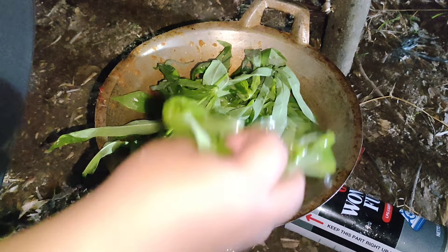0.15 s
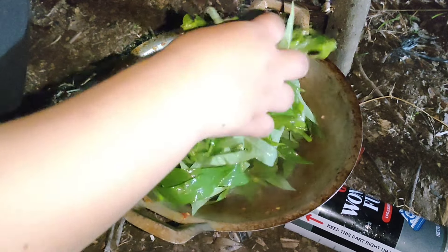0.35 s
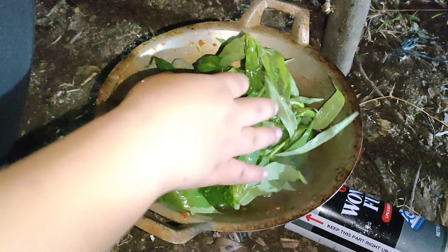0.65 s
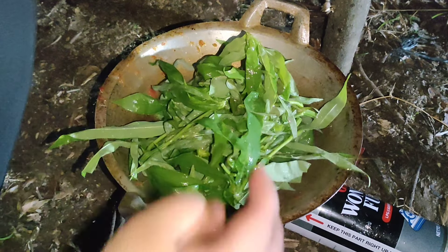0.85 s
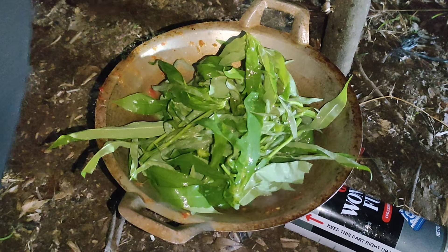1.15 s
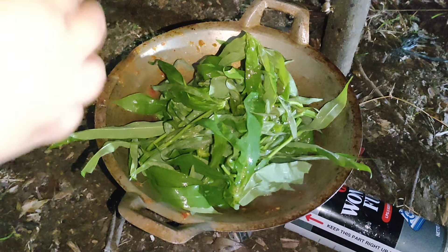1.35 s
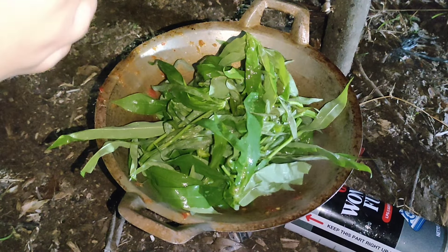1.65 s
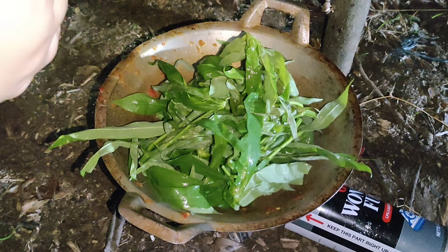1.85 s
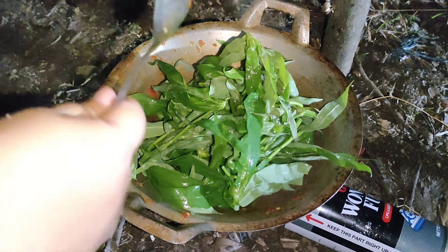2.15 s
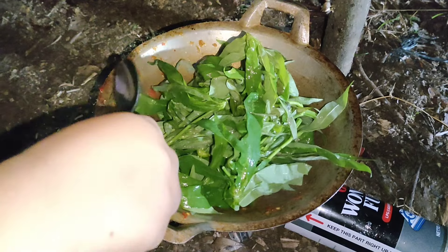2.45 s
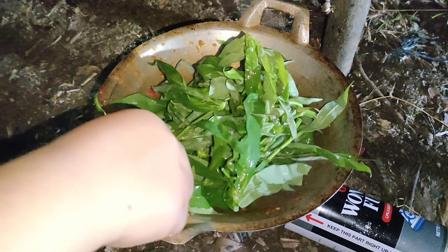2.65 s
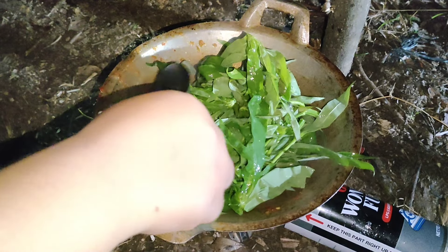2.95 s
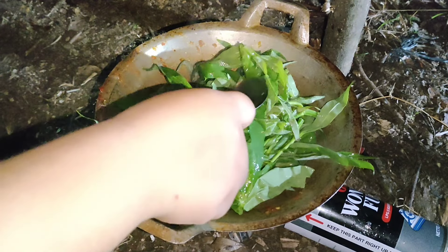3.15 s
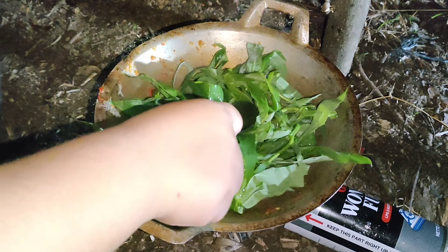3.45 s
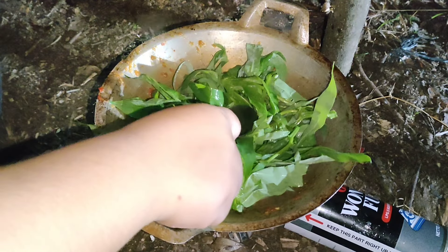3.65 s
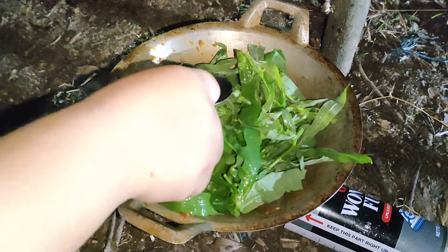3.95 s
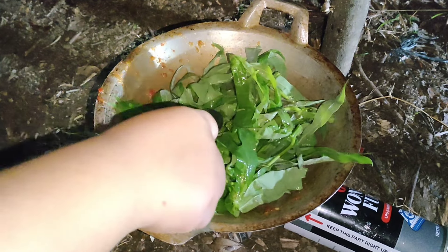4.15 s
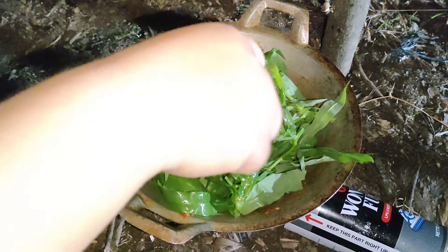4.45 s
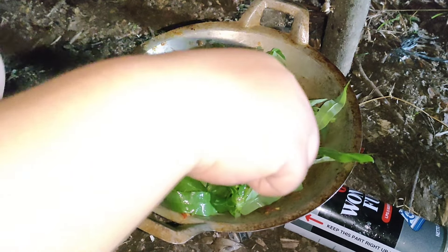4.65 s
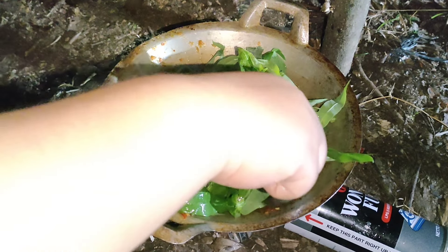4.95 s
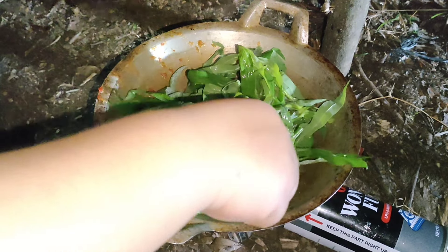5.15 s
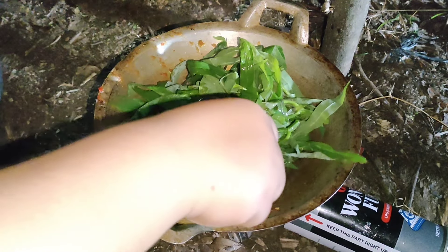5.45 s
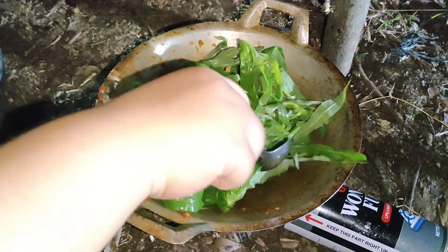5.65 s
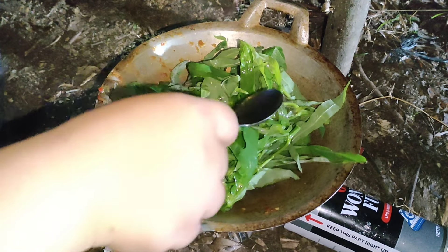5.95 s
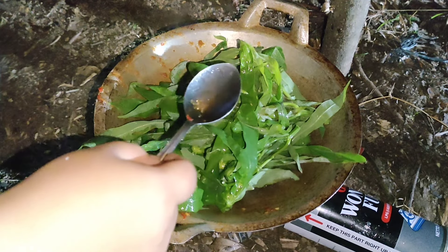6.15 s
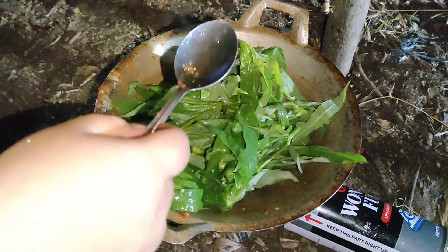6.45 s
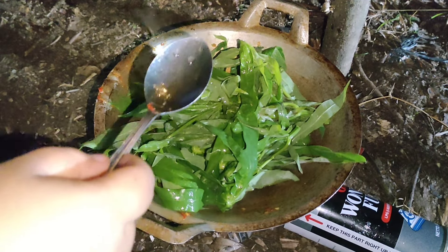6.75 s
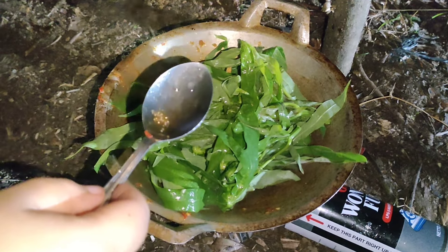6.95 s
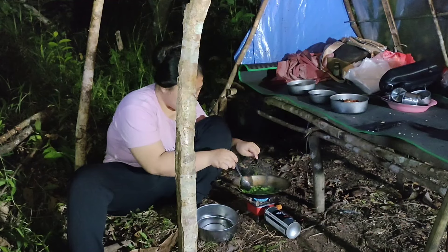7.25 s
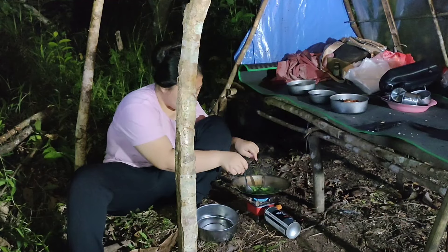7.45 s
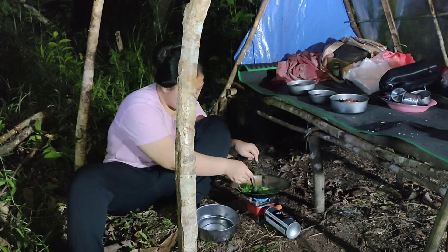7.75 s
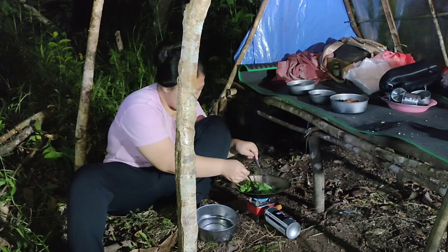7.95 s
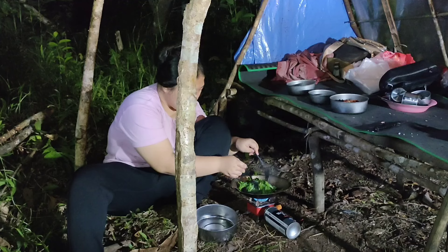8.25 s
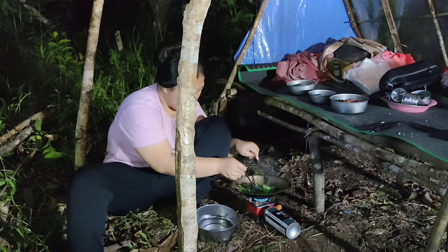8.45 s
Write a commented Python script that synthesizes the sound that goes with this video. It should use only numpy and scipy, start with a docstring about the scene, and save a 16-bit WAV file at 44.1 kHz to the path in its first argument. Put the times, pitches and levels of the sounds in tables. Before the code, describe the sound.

Night forest camp: whooping and rattling frogs over a shimmering high insect chorus, wet greens faintly sizzling and crackling close by.

```python
"""Night at a forest camp, heard through a pair of microphone ports. At first a small frog peeps while a near
frog whoops in a run of rising notes, its first whoop already under way at the start; a frog among the trees
whoops too, once faintly soon after, then in a late run. All along, others rattle in bouts of short pulse trains
over a drone of crickets and katydids, and close by wet leaves sizzle softly in a hot wok. Whoops are gliding
harmonics, rattles filtered clicks, insects pulsed tones and noise, sizzle noise bursts."""
import sys
import numpy as np
from scipy import signal
from scipy.fft import rfft, irfft, next_fast_len
from scipy.io import wavfile

SR = 44100
rng = np.random.default_rng(int(sys.argv[2]) if len(sys.argv) > 2 else 0)


def dump_mix(stems):
    """Bounce the given channels to the path in sys.argv[1] as a 16-bit WAV at rate SR."""
    frames = np.atleast_2d(stems).T  # one column per channel
    limited = np.clip(frames, -1, 1)  # hard clip at full scale
    pcm = np.round(limited * 32767).astype(np.int16)
    wavfile.write(sys.argv[1], SR, pcm)


N = 379701
TIME = np.arange(N) / SR


def amp(db):
    """Turns decibels into a factor of amplitude."""
    return 10 ** (np.asarray(db) / 20)


def unit(x):
    """Scales to rms 1."""
    return x / np.sqrt(np.mean(x ** 2) + 1e-20)


def read(points, hz):
    """Reads a curve whose points are joined by straight lines in log frequency."""
    f, value = np.transpose(points)
    return np.interp(np.log(hz + 1e-6), np.log(f), value)


def add(mix, s, sound):
    """Mixes a sound in at a time in seconds; what falls before zero is lost."""
    at = round(s * SR)
    sound = sound[..., max(-at, 0):]
    part = mix[:, max(at, 0):][:, :sound.shape[-1]]
    part += sound[..., :part.shape[1]]


def colour(x, gain):
    """Filters by a function of frequency; rms 1."""
    size = next_fast_len(x.shape[-1])
    spectrum = rfft(x, size) * gain(np.fft.rfftfreq(size, 1 / SR))
    return unit(irfft(spectrum, size)[..., :x.shape[-1]])


def band(shape, hz, width):
    """Noise in a steep resonance; rms 1."""
    noise = rng.standard_normal(shape)
    return colour(noise, lambda f: 1 / (1 + (2 * (f - hz) / width) ** 2) ** 1.5)


def drift(size, rate):
    """Slow random wandering, with rate turning points a second."""
    knots = rng.standard_normal(int(size / SR * rate) + 2)
    return np.interp(np.arange(size) / SR * rate, np.arange(len(knots)), knots)


def pair(x, alike):
    """Makes two unrelated channels partly alike (0-1)."""
    return np.array([x[0], alike * x[0] + np.sqrt(1 - alike ** 2) * x[1]])


def spells(rows, attack, release, rest_db):
    """Gain over the whole scene: each row (s, length, dB) rises, holds and dies back to a resting level."""
    gains = []
    for s, length, db in rows:
        rise = np.clip((TIME - s) / attack, 0, 1)
        fall = np.exp(-np.maximum(TIME - s - length, 0) / release)
        gains.append(amp(db) * rise * fall)
    return np.maximum(np.max(gains, axis=0), amp(rest_db))


def ports(x, lead, left_db):
    """A point source reaches the two microphone ports with a phase lead and a balance that vary with pitch."""
    hz = np.fft.rfftfreq(N, 1 / SR)
    half = np.exp(.5j * read(lead, hz)) * amp(read(left_db, hz) / 2)
    return irfft(rfft(x) * np.array([half, 1 / half]), N)


def forest(x):
    """Sparse echoes from trunks and leaves, each band dying at its own speed."""
    # time to die by 60 dB: hz, t60_s
    decay = [(300, .3), (700, 0.73), (1400, 0.44), (3500, 0.73), (8000, 0.43)]
    # some 1800 echoes a second, none in the first 8 ms
    taps = rng.standard_normal((2, SR)) * (rng.random((2, SR)) < 1800 / SR) * (TIME[:SR] > .008)
    hz, t, z = signal.stft(taps, SR, nperseg=256)
    tail = signal.istft(z * amp(-60 * t / read(decay, hz)[:, None]), SR, nperseg=256)[1]
    tail /= np.linalg.norm(tail, axis=1, keepdims=True)
    return signal.fftconvolve(x, tail, axes=1)[:, :N]


def whooping_frogs():
    """A near whooping voice and one among the trees: direct sound at the ports plus forest echoes."""
    # shape of one whoop: from_middle_s, pitch_hz, effort_db, roughness (0-1)
    near_note = [(-.088, 320, -30, .05), (-.068, 395, -14.5, .05), (-.047, 476, -16.5, .6),
                 (-.034, 533, -8.5, .25), (-.02, 595, -2, .02), (.025, 697, 3, .01), (.052, 753, 2.5, .01),
                 (.066, 767, -9, 0.02), (.088, 750, -22, .05)]
    far_note = [(-.06, 417, -8.5, 0.12), (-.04, 486, -20.5, 1), (-.02, 578.6, -9.5, 0.083),
                (0, 623, -4.5, 0.023), (.03, 718, 9, .02), (.06, 770, -2, .03), (0.084, 811.7, -3, .05),
                (.11, 776, -25, .08)]
    # vocal sac and the path through the undergrowth: hz, gain_db
    near_sac = [(350, -31), (500, -10.5), (640, -9), (720, -19.5), (900, -12), (1080, -6), (1170, -2.5),
                (1290, 3), (1390, -3.5), (1505, 4), (1720, -15), (2100, -8), (2500, -19), (3300, -40)]
    far_sac = [(420, -36.5), (560, 4.5), (690, -5.5), (750, -20.5), (820, -9), (1100, -2), (1400, -0.5),
               (1550, 1), (1680, 11.5), (1850, -11), (2200, -12), (3000, -19)]
    # a run of near whoops: middle_s, level_db (before the mix below), pitch_factor
    near_rows = [(.354, -22.5, 0.99), (.779, -23, 1), (1.178, -22.5, 1.0), (1.557, -22.5, 0.99),
                 (1.916, -23, 1.002), (2.275, -23.5, 1), (2.677, -25, 1)]
    # whoops given the farther voice: the near frog's whoop cut off at the start, then the tree frog's, one
    # early and faint, the rest late: columns as above
    far_rows = [(-.075, -26, 0.9), (.435, -44, 0.94), (6.63, -44, .99), (7.223, -40.5, 1.004),
                (7.62, -39, 1.005), (7.98, -39, 1.01), (8.337, -39, 1.02)]
    # phase lead of the left port: hz, lead_rad
    near_lead = [(520, 1.4), (630, -.5), (720, 0), (790, 1.8), (1290, 1.6), (1390, 2.4), (1490, 1.9)]
    far_lead = [(700, 1.07), (1300, 2.61)]
    # how much louder the left port is: hz, balance_db
    near_balance = [(560, 8), (745, -11.5), (1140, 7), (1290, -2.5), (1400, 4), (1520, 3)]
    far_balance = [(700, -3), (1400, 1)]

    near = whoops(near_rows, near_note, near_sac)
    far = whoops(far_rows, far_note, far_sac)
    far = far * np.minimum(TIME / .006, 1)  # 6 ms fade-in at the very start
    direct = amp(3.5) * ports(near, near_lead, near_balance)
    direct += amp(4.0) * ports(far, far_lead, far_balance)
    # the second harmonic carries farthest
    carrying = signal.butter(3, [1020, 1750], "band", fs=SR, output="sos")
    spread = amp(-15.5) * near + amp(-9) * far
    return direct + forest(signal.sosfilt(carrying, spread) + amp(-11.5) * spread)


def whoops(rows, note, sac, hoarse_db=-7, third_db=-15, shimmer_db=.5):
    """A rising glide, hoarse early on; its harmonics sweep through the sac's peaks."""
    out = np.zeros((2, N))
    s, *columns = np.transpose(note)
    t = np.arange(s[0], s[-1], 1 / SR)
    size = len(t)
    pitch, effort_db, rough = (np.interp(t, s, c) for c in columns)
    for middle, db, factor in rows:
        hz = pitch * factor * (1 + .0015 * drift(size, 200) + .004 * drift(size, 30))
        phase = 2 * np.pi * np.cumsum(hz) / SR
        first, second, third = (amp(read(sac, k * hz)) * np.cos(k * phase) for k in range(1, 4))
        voice = first + second * amp(shimmer_db * drift(size, 90))
        # full effort brings out the third harmonic
        voice += third * amp(third_db + effort_db / 2 + 4.1 * drift(size, 90))
        # uneven cycles put lines between the harmonics
        between = np.cos(3 / 2 * phase + drift(size, 150))
        between += np.cos(5 / 2 * phase + drift(size, 150)) / 2
        voice += rough / 2 * between
        voice += amp(hoarse_db) * rough * band(size, hz=740, width=320)
        swell = amp(db + effort_db) * (1 + 0.14 * rough * drift(size, 330))
        swell *= signal.windows.tukey(size, 1 / 10)
        add(out, middle + s[0], np.sqrt(2) * swell * voice)
    return out


def rattling_frogs(pulse_hz=268, jitter=.07, smear_db=-7, gain_db=-6.0, wet_db=-5, blur=1.2):
    """Each croak is a train of clicks in the vocal sac; foliage smears the clicks of distant frogs."""
    # colour of a croak: multiple of the sac resonance, gain_db (stretched 1.5 to 2 times with distance)
    sac_colour = [(.6, -40), (.8, -12.5), (.92, -7.5), (1.0, -2), (1.16, -7.5), (1.33, -14), (1.65, -23.5),
                  (2.3, -54.5), (4, -91)]
    # its lower band, for a throat resonance at throat_ref_hz: hz, gain_db (stretched likewise not at all)
    low_colour = [(800, -59), (1200, -31), (1500, -5), (1720, -1), (1850, 3), (2100, 0), (2400, 0.5),
                  (2900, -11.5), (3500, -40)]
    throat_ref_hz = 1850

    direct, scattered, t = np.zeros((2, N)), np.zeros((2, N)), TIME[:6000]
    for s, length, db, sac_hz, throat_hz, low_db, distance, lead in croaks():
        rate = pulse_hz * (1 + .07 * rng.standard_normal() + jitter * drift(len(t), 200))
        turns = np.cumsum(rate) / SR
        # distant croaks swell and fade more gently
        swell = np.sin(np.pi * np.clip(t / (length * 1.166), 0, 1)) ** (1 / 4 + blur * distance ** 2)
        # one click a turn, each of its own strength
        clicks = np.diff(np.floor(turns), prepend=0) * swell * amp(rng.standard_normal(len(t)))
        leaves = rng.standard_normal((2, 1500)) * np.exp(-t[:1500] / (.003 + .009 * distance))
        leaves *= (amp(smear_db) + distance) / np.linalg.norm(leaves[0])
        leaves[:, 0] += 1 - distance  # the unsmeared click
        drive = signal.fftconvolve(clicks[None], leaves, axes=1)[:, :len(t)]
        # from afar, little but the sac's main resonance is heard
        stretch = 1.5 + distance ** 2 / 2
        croak = colour(drive, lambda f: amp(read(sac_colour, f / sac_hz) * stretch))
        low = colour(drive, lambda f: amp(read(low_colour, f * throat_ref_hz / throat_hz)))
        croak += amp(low_db) * low
        # the throat's low resonance sinks and swells as the croak ends
        progress = np.clip(t / (length * 1.3), 0, 1)
        sinking = np.cos(2 * np.pi * np.cumsum(1560 - 300 * progress) / SR)
        sinking *= progress * np.sin(np.pi * progress)
        croak += amp(low_db) * distance * unit(sinking * band((2, len(t)), hz=30, width=140))
        croak *= amp(db + gain_db) * np.sqrt(len(t) / SR / length)
        croak[1] = np.roll(croak[1], round(lead))
        add(direct, s, croak)
        add(scattered, s, croak * (0.32 + 0.94 * distance))
    return direct + amp(wet_db) * forest(scattered)


def croaks():
    """Within a bout croaks start evenly and the last ones drift late or early; their level follows one arc."""
    # bouts, one frog each: first_croak_s, last_croak_s, gap_s, croak_length_s,
    # opening_db, middle_db, closing_db (before the rattle's gain), sac_hz, throat_hz,
    # lower_band_db, distance (0-1), left_lead_samples (rounded when used)
    bouts = [(-.108, .704, .1625, .056, -38.5, -38, -37.5, 3590, 1850, -13, 0.61, 9.5),
             (1.619, 2.54, .145, 0.047, -41.5, -41, -41, 3307, 1850, -16.5, 0.75, 8),
             (2.875, 3.354, .154, 0.045, -52.5, -52, -50, 3590, 1850, -21, 1, 6),
             (3.257, 4.46, .1345, 0.045, -47.5, -39, -41, 3490, 1760, -11.5, 0.36, 6.5),
             (4.412, 5.25, .139, .046, -43, -42.5, -45, 3520, 1790, -14.5, 0.42, 6),
             (5.727, 6.557, 0.16, .04, -34.5, -33, -33, 3310, 1960, -13, 0.23, -3),
             (5.78, 5.939, .158, 0.0342, -34, -34, -35, 3550, 1900, -17, .38, -1.5),
             (6.011, 6.448, 0.14, 0.046, -42, -43, -43, 3600, 1850, -13.5, 0.96, 8),
             (6.703, 6.703, 0.14, .042, -47, -46.5, -46, 3770, 1850, -27, 0.8, 6.5),
             (7.185, 7.54, .197, 0.0587, -37.5, -36.5, -36, 3570, 1850, -15.5, 0.74, 8),
             (7.715, 7.886, 0.18, 0.037, -46.5, -46.5, -46.5, 3564, 1850, -15.5, 0.67, 7.5),
             (8.43, 8.571, .142, 0.038, -35.5, -36.5, -36, 3650, 1900, -17, 0.34, 8)]
    bend = 6  # the shift off the even pace grows by this power of the bout's progress
    chance_db = .4  # random spread of a croak's strength
    for first, last, gap, length, opening_db, middle_db, closing_db, *voice in bouts:
        steps = round((last - first) / gap)
        shift = last - first - steps * gap
        for progress in np.linspace(0, 1, steps + 1):
            db = np.interp(progress, [0, .5, 1], [opening_db, middle_db, closing_db])
            db += chance_db * rng.standard_normal()
            s = first + steps * gap * progress + shift * progress ** bend
            yield s, length, db, *voice


def peeping_frog():
    """A small frog's short, nearly pure peeps: narrow noise in one resonance."""
    # peeps: time_s (8 ms after the onset), level_db (before gain_db), pitch_hz
    peeps = [(.058, -45.5, 3250), (.19, -43.5, 3270), (.355, -43, 3190), (.52, -40, 3290)]
    return chirps(peeps, width_hz=140, rise=0.017, gain_db=1.0)


def chirps(rows, width_hz, rise, gain_db):
    """Brief narrow-band noises that swell and fade, alike at both ports."""
    out, t = np.zeros((2, N)), TIME[:9000]
    shape = (t / rise) * np.exp(1 - t / rise)
    for s, db, hz in rows:
        add(out, s - .008, amp(db + gain_db) * shape * band(len(t), hz, width_hz))
    return out


def wok(snap_decay=0.0016, pops_per_s=60, pop_db=9):
    """Tiny steam bursts come in clumps as wet leaves touch the metal; a few pop louder, and stalks snap."""
    # frying leaves: hz, relative_db
    sizzle_colour = [(60, -34.5), (200, -14.5), (500, -11), (900, -3), (2200, -4.5), (4000, 7), (7000, 3),
                     (10000, 0.5), (15000, 7.5)]
    # each stir presses wet leaves on the hot metal: start_s, length_s, gain_db (on sizzle and pops)
    stirs = [(.28, .1, -72), (.72, 0.11, -74), (1.0, .17, -67), (1.28, .3, -77), (2.23, 0.16, -72),
             (2.62, 0.2, -70), (2.95, .3, -80), (3.5, 0.22, -69), (3.95, .32, -68), (5.36, .16, -62),
             (5.5, .35, -57), (5.9, .35, -58), (6.3, 0.444, -67.5), (6.76, 0.21, -63.5),
             (7.56, 0.15, -59.5), (7.8, 0.43, -69.5)]
    # leaf stalks snap under the spoon: start_s, level_db (before a lift of 3.5 dB)
    snaps = [(1.023, -51), (1.501, -50.5), (3.558, -54.5), (5.681, -45), (5.741, -43), (6.925, -50),
             (7.589, -55), (8.031, -52), (8.241, -57)]

    size_db = 3.5 * np.minimum(rng.exponential(1, (2, N)), 5) + 3 * drift(N, 16)
    bursts = rng.standard_normal((2, N)) * amp(size_db) * (rng.random((2, N)) < 5000 / SR)
    sizzle = amp(5.5) * colour(pair(bursts, alike=.93), lambda f: amp(read(sizzle_colour, f)))
    pops = (rng.random(N) < pops_per_s / SR) * amp(3 * rng.standard_normal(N))
    pop_swell = signal.fftconvolve(pops, np.exp(-TIME[:400] / .0007))[:N]
    crackle = pop_swell * band((2, N), hz=5500, width=8000)
    stirring = spells(stirs, attack=.036, release=.04, rest_db=-87.5)  # between stirs it simmers
    out = (sizzle + amp(pop_db) * crackle) * stirring
    for s, db in snaps:
        snap = band(900, hz=7030, width=9300) * np.exp(-TIME[:900] / snap_decay)
        add(out, s, amp(db + 3.5) * snap)
    return out


def bumps():
    """Dull, short knocks and rubs, and the faint ring of the wok, all bands of noise that swell and fade."""
    # the cook's soft bumps and spoon scrapes, and a faint ring of the wok near 775 Hz: start_s, level_db, hz,
    # width_hz, length_s (the peak is at a quarter of it, the end at twice it)
    knocks = [(0.585, -59, 464, 181, 0.017), (1.292, -52, 80, 70, 0.032), (1.293, -48.5, 260, 309, 0.029),
              (2.968, -63.5, 303, 23.2, 0.074), (5.25, -68, 775, 80, .1), (5.406, -62.5, 1300, 930, 0.2),
              (5.549, -62, 1340, 794, 0.38), (7.708, -49, 790, 150, .17)]
    # the wok's modes: hz, width_hz, relative_db, length_s (as above)
    modes = [(506, 19, -2, 0.063), (670, 5.7, -1, .16)]
    # the spoon's touches that make it ring: start_s, level_db
    touches = [(3.85, -75), (5.575, -65.5)]

    out = np.zeros((2, N))
    rings = [(s, db + mode_db, hz, width, length)
             for s, db in touches for hz, width, mode_db, length in modes]
    for s, db, hz, width, length in knocks + rings:
        u = TIME[:round(2 * length * SR)] / (length / 4)
        swell = u * np.exp(1 - u) * signal.windows.tukey(len(u), 1 / 10)
        add(out, s, amp(db) * band(len(u), hz, width) * swell)
    return out


def wingbeats(size, rate, depth):
    """Level swings once for every stroke of the wings; rms 1."""
    turns = np.cumsum(rate * (1 + .04 * drift(size, 8))) / SR
    return unit(1 + depth * np.cos(2 * np.pi * turns))


def chorus():
    """Many far insects blur into pulsing bands of noise; one katydid band comes and goes."""
    # chorus bands: hz, width_hz, level_db, pulses_per_s, pulse_depth (0-1)
    bands = [(2750, 140, -69, 33, 0.4), (3323, 200, -60.5, 41, .5), (4817, 260, -55.5, 140, 0.1),
             (4996, 500, -59.5, 17, 0.3), (5310, 350, -63.5, 42, 0.1), (9290, 770, -67.5, 55, 0.1)]
    # long katydid buzzes: start_s, length_s, level_db (before a cut of 3 dB)
    buzzes = [(-.2, .35, -51), (.5, 1.24, -54.5), (2.15, 0.61, -54), (3.3, 4.3, -56), (6.9, 0.88, -55),
              (8.2, 0.42, -53.5)]
    out = sum(amp(db) * band((2, N), hz, width) * wingbeats(N, rate, depth)
              for hz, width, db, rate, depth in bands)
    katydid = band((2, N), hz=6520, width=430) * wingbeats(N, rate=31, depth=0.34)
    katydid = katydid * spells(buzzes, attack=.23, release=.077, rest_db=-61)
    return pair(out, alike=0.089) + amp(-3.0) * pair(katydid, alike=0.3)


def crickets(fuzz_db=-11):
    """Single crickets: a pulsed tone with a narrow haze of echoes round it."""
    # single trills: start_s, end_s, pitch_hz, level_db, pulses_per_s, pulse_depth (0-1)
    trills = [(0.749, 1.692, 3252, -58.5, 34, 0.5), (.8, 1.657, 3545, -69.5, 33, .4),
              (1.603, 2.56, 9340, -67.5, 52, 0.2), (2.65, 3.242, 3470, -64.5, 47, 0.01),
              (3.181, 3.825, 5740, -61.5, 12, .15), (6.752, 7.602, 3540, -62, 34, 0),
              (6.999, 8.297, 9331, -71.5, 52, 0.06), (7.498, 8.56, 3278, -61.5, 26, 0.84)]
    out = np.zeros((2, N))
    for start, end, hz, db, rate, depth in trills + refrains():
        size = round(max(end - start, .05) * SR)
        tone = np.sqrt(2) * np.sin(2 * np.pi * np.cumsum(hz + 5 * drift(size, 30)) / SR)
        trill = tone + amp(fuzz_db) * band((2, size), hz, width=90)
        swell = wingbeats(size, rate, depth) * signal.windows.tukey(size, .15)
        add(out, start, amp(db) * trill * swell)
    return out


def refrains():
    """One high cricket repeats its trill all along, alike but for a slight change of pitch."""
    # start_s of each trill
    starts = [.23, .8, 1.37, 2.02, 2.67, 3.33, 3.97, 4.59, 5.279, 6.15, 6.731, 7.33, 8.0]
    length_s, pitch_hz, spread_hz = .43, 7380, 20
    level_db, pulses_per_s, depth = -68.5, 49, .6
    return [(s, s + length_s, pitch_hz + spread_hz * rng.standard_normal(), level_db, pulses_per_s, depth)
            for s in starts]


def phrases(rows, gap, hz, spread_hz):
    """Evenly spaced chirps (s, dB, Hz) about a gap apart, each a little off the insect's pitch."""
    return [(s, db, hz + spread_hz * rng.standard_normal())
            for one_end, other_end, db in rows
            for s in np.linspace(one_end, other_end, round(abs(other_end - one_end) / gap) + 1)]


def low_chirper():
    """The lower insect chirps in phrases: noise in a wing resonance."""
    # phrases: first_chirp_s, last_chirp_s (each 8 ms after the onset), level_db (before gain_db)
    low_rows = [(.17, 0.5, -51.5), (1.332, 1.332, -50.5), (2.35, 2.845, -51), (3.993, 4.56, -50.5),
                (5.381, 6.209, -47), (6.889, 7.06, -51), (7.919, 8.1, -54.5)]
    rows = phrases(low_rows, gap=.167, hz=6535, spread_hz=80)
    return chirps(rows, width_hz=260, rise=0.024, gain_db=-3.0)


def high_chirper():
    """The higher insect chirps in quicker phrases: noise in a wider wing resonance."""
    # phrases: one_end_s, other_end_s (either may come first; 8 ms after the onset),
    # level_db (before gain_db)
    high_rows = [(.047, 0.14, -49.5), (.445, 0.54, -53), (.738, 0.79, -55), (1.241, 1.38, -53.5),
                 (1.542, 1.96, -49.5), (2.22, 2.75, -52.5), (4.092, 4.03, -55), (4.906, 5.5, -58),
                 (5.533, 5.533, -48), (5.977, 5.88, -46.5), (6.395, 6, -55), (6.723, 7.04, -54.5)]
    rows = phrases(high_rows, gap=.113, hz=10820, spread_hz=200)
    return chirps(rows, width_hz=730, rise=0.017, gain_db=-7.5)


def faint_chirpers(count=50, db=-64, spread_db=3):
    """More insects, farther off, chirp at random times, levels and pitches."""
    when, loud, high = rng.random((count, 3)).T
    rows = np.transpose([when * N / SR, db + spread_db * (2 * loud - 1), 10200 + 1300 * high])
    return chirps(rows, width_hz=390, rise=0.011, gain_db=-2.0)


def air():
    """Low murmur of the burner under the faint hiss of the forest: coloured noise, wavering slightly."""
    # night air and the stove: hz, relative_db
    air_colour = [(25, -18.5), (70, -8.5), (180, 3.5), (260, -3.5), (500, -6.5), (1000, -16.5), (2200, -17),
                  (3600, 5), (4300, -8.5), (5800, -4), (6900, -2), (8500, -8), (10000, -17), (12500, -46)]
    noise = pair(rng.standard_normal((2, N)), alike=0.58)
    return amp(-61) * colour(noise, lambda f: amp(read(air_colour, f))) * amp(.6 * drift(N, 13))


def scene():
    """Frogs and insects all round, the wok close by."""
    frogs = whooping_frogs() + rattling_frogs() + peeping_frog()
    insects = chorus() + crickets() + low_chirper()
    treble = high_chirper() + faint_chirpers()
    # the insects lean to the left port, the highest ones most
    insects = insects * amp([[.7], [-.7]])
    treble = treble * amp([[2], [-2]])
    return frogs + wok() + bumps() + insects + treble + air()


def record(dry):
    """The recorder's band limit: a steep low-pass at 15.5 kHz."""
    lowpass = signal.firwin(511, 15500, window=("kaiser", 9), fs=SR)
    return signal.oaconvolve(dry, lowpass[None], "same")


dry = scene()
out = record(dry)
dump_mix(out)
```